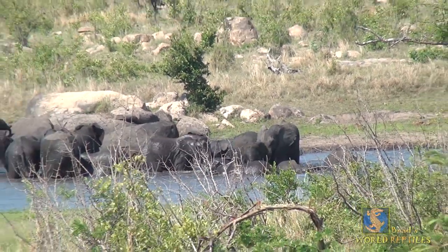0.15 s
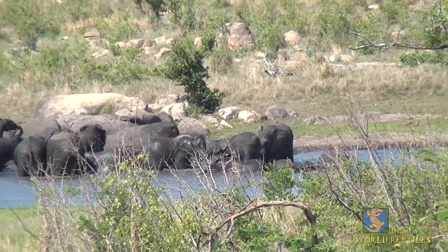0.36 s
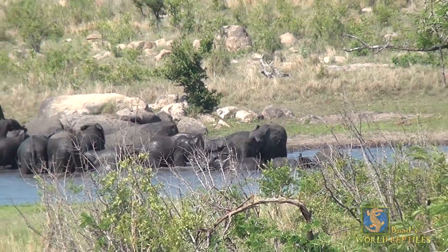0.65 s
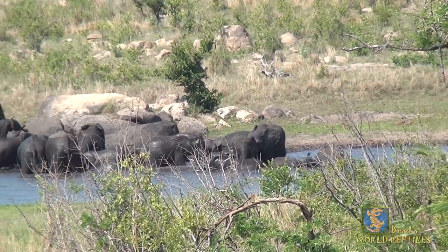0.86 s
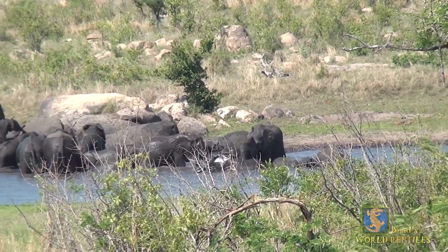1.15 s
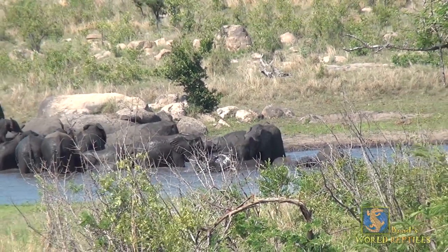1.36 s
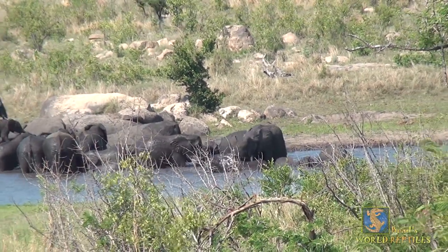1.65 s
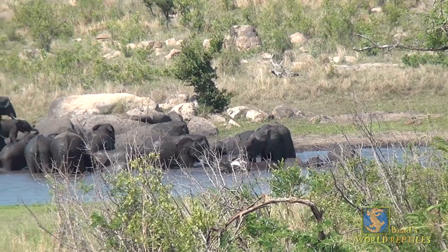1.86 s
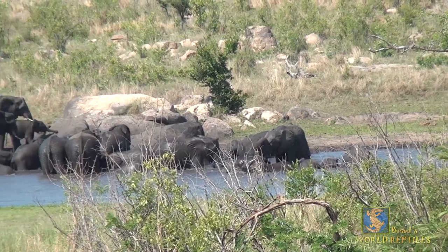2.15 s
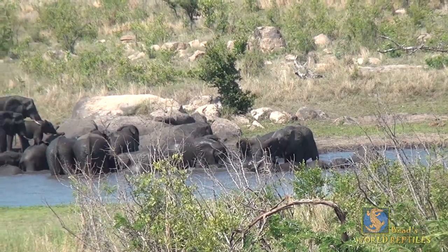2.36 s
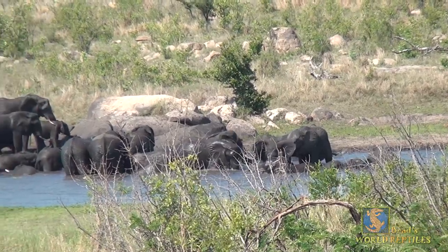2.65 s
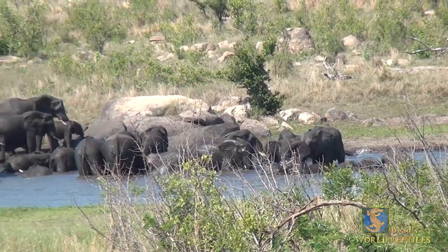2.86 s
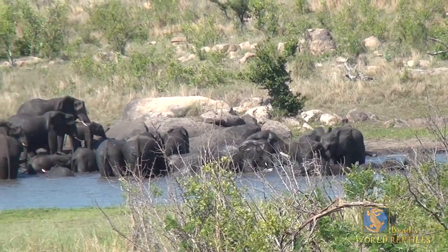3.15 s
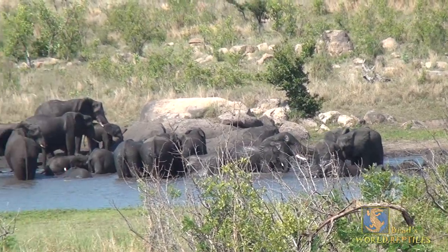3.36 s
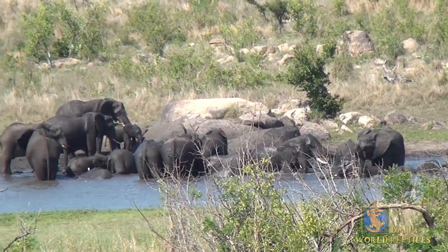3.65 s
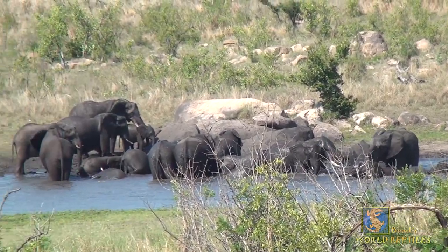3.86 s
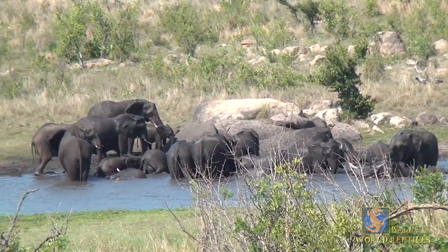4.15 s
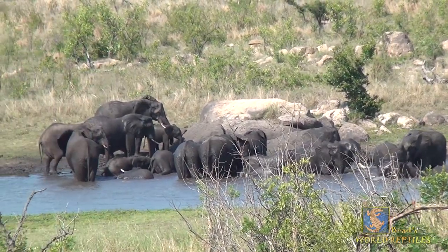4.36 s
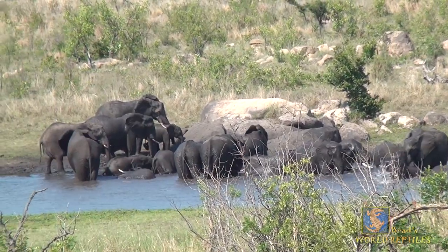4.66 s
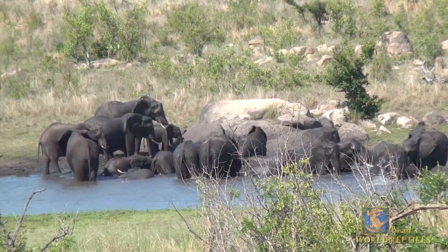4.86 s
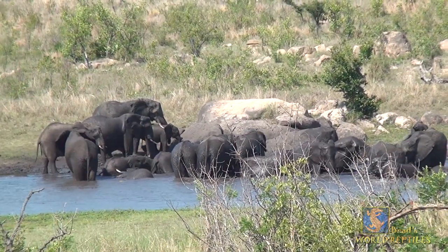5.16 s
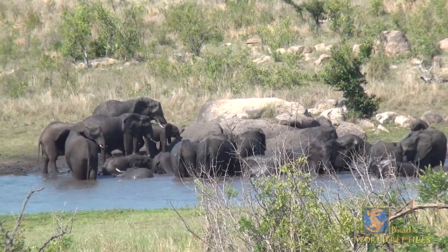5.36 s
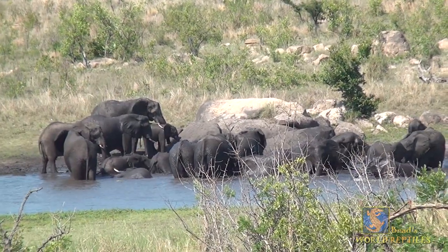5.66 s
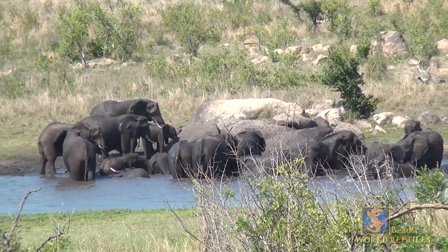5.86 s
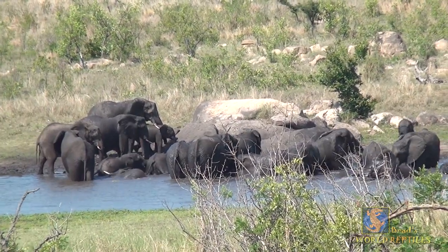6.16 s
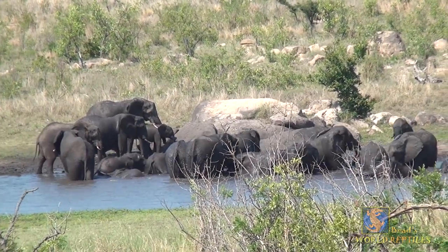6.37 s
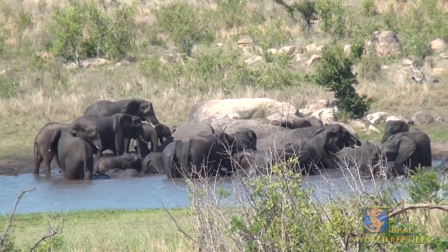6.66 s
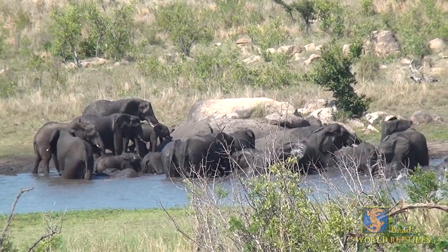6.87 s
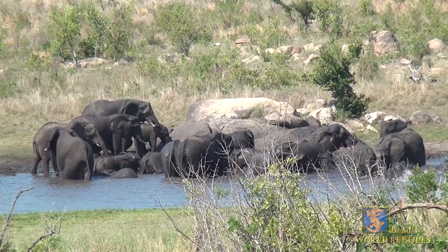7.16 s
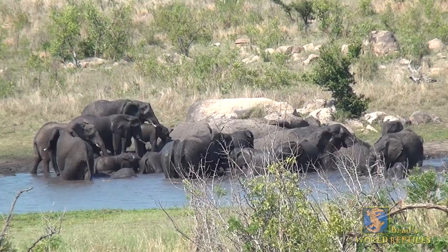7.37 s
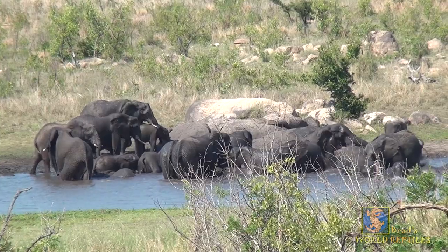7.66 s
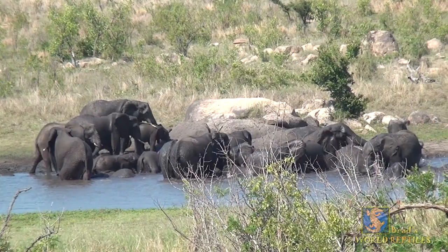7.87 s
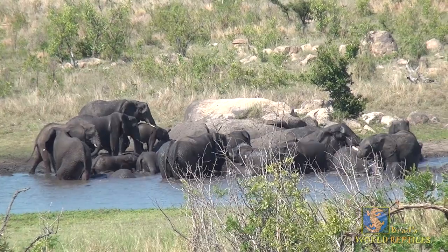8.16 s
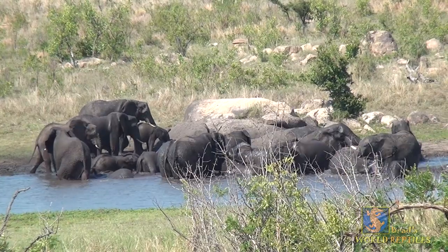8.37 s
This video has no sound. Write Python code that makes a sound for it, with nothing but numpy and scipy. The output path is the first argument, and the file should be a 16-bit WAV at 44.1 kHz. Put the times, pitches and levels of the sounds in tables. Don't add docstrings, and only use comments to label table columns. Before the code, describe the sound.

Several cicadas drone without pause in lakeside shrubs, a shrill, grainy buzz flickering in strength. Gusts thump and rumble against an unshielded microphone, heaviest from about 2.5 to 5 seconds, then easing until a short late return. A small bird pips about three times a second with gaps, others whistle thinly, and elephants wading at the far shore make faint splashes. Twigs snap now and then.

```python
import sys
import numpy as np
from scipy import signal
from scipy.fft import rfft, irfft
from scipy.io import wavfile
from scipy.ndimage import uniform_filter1d

SR = 44100
rng = np.random.default_rng(int(sys.argv[2]) if len(sys.argv) > 2 else 0)


def linear_from_db(decibels):
    return 10 ** (np.asarray(decibels, float) / 20)


def wav_out(sig):
    wavfile.write(sys.argv[1], SR, np.round(np.clip(np.atleast_2d(sig).T, -1, 1) * 32767).astype(np.int16))


N = 375732
TIME = np.arange(N) / SR

# (time [s], burst rate [Hz])
NEAR_RATE = [(0, 70.03), (1.25, 70.03), (1.55, 70.85), (1.87, 71.04), (2.02, 71.58), (2.25, 71.63),
             (3.17, 71.62), (3.85, 71.27), (4.0, 71.13), (4.4, 71.0), (4.95, 70.97), (5.95, 70.5),
             (6.7, 70.25), (7.25, 70.03), (7.8, 70.17), (8.0, 70.06), (8.52, 69.92)]
# (time [s], hold [s], level [dB])
SEVENTH = [(0, 0.18, -69), (.45, .32, -73), (.88, .06, -71), (1.05, .3, -76), (1.647, 0.058, -64),
           (1.8, 0.062, -65), (2.114, 0.103, -57.5), (2.26, 0.097, -58), (2.473, 0.184, -64),
           (2.736, 0.044, -59.5), (2.931, 0.158, -60.9), (3.276, 0.316, -65.5), (3.807, 0.019, -62),
           (4.343, 0.044, -66), (4.435, 0.065, -62), (5.051, 0.034, -66), (6.98, 0.115, -62.5),
           (7.274, 0.043, -64)]
EIGHTH = [(0.156, 0.239, -58), (0.531, 0.044, -53.0), (0.733, 0.136, -57.5), (1.073, 0.126, -58),
          (1.399, 0.177, -57.7), (1.662, 0.023, -54), (1.778, 0.12, -56), (2.161, 0.348, -51.5),
          (2.206, 0.063, -53), (2.29, 0.054, -45.0), (2.645, 0.046, -48), (2.822, 0.075, -52),
          (2.987, 0.16, -49), (3.235, 0.206, -54.5), (3.352, 0.072, -48.5), (3.505, 0.119, -54.4),
          (3.954, 0.13, -52.5), (4.103, 0.447, -55.7), (4.399, 0.079, -51), (4.633, 0.069, -51),
          (4.773, 0.096, -58.5), (4.963, 0.13, -52.5), (5.274, 0.041, -57), (5.405, 0.03, -54),
          (5.672, 0.032, -56), (5.845, 0.026, -56), (6.185, 0.046, -60), (6.415, 0.042, -59),
          (6.62, 0.09, -59.5), (6.995, 0.08, -49.5), (7.19, 0.15, -55.5), (7.505, 0.042, -64),
          (7.735, 0.061, -63), (7.99, 0.11, -61), (8.2, 0.2, -61)]
NINTH = [(0.161, 0.07, -50.7), (0.324, 0.088, -52), (0.502, 0.11, -57), (0.815, 0.054, -53),
         (0.997, 0.033, -56), (1.102, 0.046, -56), (1.206, 0.088, -48.5), (1.425, 0.481, -51),
         (1.581, 0.054, -52), (1.834, 0.044, -51), (2.018, 0.428, -60), (2.047, 0.028, -48),
         (2.186, 0.14, -49.5), (2.505, 0.386, -58), (2.565, 0.016, -50.5), (2.653, 0.034, -48),
         (2.955, 0.14, -46.5), (3.253, 0.077, -50.5), (3.435, 0.184, -51.5), (3.774, 0.031, -51.5),
         (4.025, 0.19, -48.5), (4.326, 0.441, -55), (4.613, 0.057, -49.5), (4.963, 0.075, -49.5),
         (5.256, 0.062, -56), (5.384, 0.064, -55), (5.717, 0.12, -52), (6.174, 0.046, -56),
         (6.625, 0.05, -63), (6.815, 0.05, -62), (6.981, 0.08, -54.5), (7.202, 0.06, -50.5),
         (7.29, 0.1, -56.5), (7.69, 0.11, -60.5), (7.97, 0.12, -61), (8.135, 0.05, -64), (8.41, 0.11, -60)]
TENTH = [(0.184, 0.008, -55), (0.287, 0.045, -56), (0.74, 0.1, -54), (1.042, 0.013, -56),
         (1.191, 0.058, -54.8), (1.436, 0.021, -57), (1.65, 0.044, -57), (1.865, 0.025, -51),
         (2.017, 0.128, -56), (2.233, 0.052, -57.0), (2.385, 0.343, -56), (2.97, 0.14, -53),
         (3.225, 0.037, -54), (3.404, 0.071, -62), (3.592, 0.029, -56.9), (3.855, 0.058, -54),
         (3.994, 0.12, -59.9), (4.314, 0.123, -54.5), (4.581, 0.12, -54), (4.999, 0.0098, -56),
         (5.346, 0.034, -54), (6.958, 0.2, -58), (7.291, 0.07, -63)]
NEAR_LULL_DB = [-75.5, -65.5, -63, -65.5]
NEAR_RISE_DB_S, NEAR_FALL_DB_S = 312, 309

# (time [s], burst rate [Hz])
FAR_RATE = [(0, 76.22), (1.9, 76.35), (2.6, 76.43), (3.8, 76.26), (5.3, 76.25), (5.8, 76.11), (6.6, 76.08),
            (7.4, 75.9), (7.9, 75.62), (8.52, 75.5)]
FAR_DB = [-75, -65, -65.5, -85]
# (time [s], hold [s], level [dB])
FAR_SWELLS = [
    (0, 1.96, 0.5),
    (3.0, 2.3, 0.61),
    (5.9, .7, -0.5),
    (7.7, .8, -0.5),
]
FAR_LULL_DB = -5

# (frequency [Hz], level [dB])
RINGS = [(6620, -9.5), (7010, -2), (7570, -11.5), (8070, -5), (8390, -14), (8720, -8.5), (9080, -1.5),
         (9400, -10), (10150, -6), (10430, -14.5), (11180, -15), (11440, -18)]
BUZZ_EDGES = [7300, 8600, 9700]
BUZZ_GROUP_DB = [-4.5, 1.5, -2, -7.5]
# (time [s], hold [s], level [dB])
BUZZ_LOW_SWELLS = [(0, 0.06, -47), (0.116, 0.87, -52), (0.864, 0.051, -52), (1.037, 0.46, -55.5),
                   (1.072, 0.11, -49), (1.387, 0.07, -53), (1.591, 0.5, -52.5), (1.708, 0.2, -51),
                   (2.417, 0.17, -47.5), (2.694, 0.11, -44), (2.911, 0.3, -53.5), (3.051, 0.071, -48.5),
                   (3.761, 0.075, -56), (3.97, 0.033, -50), (4.303, 0.43, -51.5), (4.315, 0.014, -48.5),
                   (4.531, 0.029, -53), (4.892, 0.23, -49), (5.216, 0.046, -51.5), (6.026, 0.162, -56),
                   (6.57, 0.58, -53.5), (6.636, 0.2, -51), (7.042, 0.22, -50), (8.092, 0.5, -56.5),
                   (8.202, 0.059, -52.5)]
BUZZ_HIGH_SWELLS = [(0, 0.31, -52.5), (0.446, 0.488, -53.5), (1.396, 0.052, -48.5), (1.602, 0.637, -63),
                    (1.67, 0.016, -50), (1.792, 0.089, -50.5), (2.402, 0.52, -46), (2.548, 0.008, -48),
                    (2.734, 0.068, -47), (2.911, 0.517, -64), (3.645, 0.055, -54), (3.976, 0.037, -47),
                    (4.154, 0.023, -52), (4.31, 0.32, -48.5), (4.536, 0.039, -50), (4.883, 0.06, -44.5),
                    (5.025, 0.041, -56), (6.004, 0.16, -52.5), (6.526, 0.355, -51), (6.674, 0.055, -44),
                    (6.953, 0.74, -55), (7.055, 0.11, -54), (7.382, 0.027, -57), (7.495, 0.069, -49.5),
                    (7.868, 0.22, -56.5), (8.318, 0.12, -55)]
BUZZ_TOP_SWELLS = [(0, .15, -51), (1.4, .05, -51), (1.8, .05, -50), (2.4, .25, -51), (2.75, .05, -43),
                   (3.68, .03, -49.5), (4.0, .05, -48), (4.2, .3, -53), (4.852, 0.098, -47),
                   (5.135, .06, -46), (6.052, 0.11, -52), (6.603, .15, -46), (7.3, .2, -54),
                   (8.0, .15, -54), (8.35, .05, -51)]
BUZZ_LULL_DB = [-65, -64, -56.5]
BUZZ_RISE_DB_S, BUZZ_FALL_DB_S = 186, 183
BUZZ_HZ = 46.25
BUZZ_SAG = .019
CHORUS_DB = -58.5

# (frequency [Hz], level per Hz [dB])
BUSH = [(18, -38), (30, 15.5), (64, -4), (130, -6.5), (243, -3.5), (811, -14), (1200, -13.5), (3600, -17),
        (4680, -14), (5620, -5.5), (6580, -10), (8110, -2), (9240, -8), (10800, -19.5), (12000, -24),
        (15600, -29.5)]
BUSH_DB = -58.5

# (frequency [Hz], level per Hz [dB])
WIND = [(15, -44), (25, -6.5), (64, 4), (114, -3.5), (259, -15), (407, -24), (667, -51.5), (900, -42),
        (1170, -75), (1980, -120)]
# (time [s], level [dB])
BREEZE = [(0, -51), (.6, -53.5), (1.6, -63), (2.5, -38), (4.5, -38), (5.15, -49.5), (5.5, -55.5),
          (5.9, -61), (7.2, -69), (7.45, -43), (8.52, -46)]
# (time [s], hold [s], level [dB], bite [dB])
GUSTS = [(0.155, 0.013, -40.5, -7), (0.479, 0.008, -47, 4), (0.524, 0.01, -36, -2),
         (0.793, 0.094, -31.5, 7.5), (0.943, 0.01, -35.5, 6), (0.983, 0.064, -34.5, 5),
         (1.162, 0.004, -24, -1), (1.282, 0.007, -35, -4), (1.372, 0.034, -41.5, -7),
         (1.691, 0.094, -36, -8), (1.856, 0.06, -35.5, -21), (2.09, 0.016, -37, 5), (2.27, 0.044, -37.5, 4),
         (2.449, 0.012, -32.5, 2), (2.684, 0.018, -27, 6), (2.759, 0.03, -23.5, 5.5),
         (2.913, 0.0046, -24, 2), (3.013, 0.014, -28, 8.5), (3.113, 0.052, -23.5, 2.5),
         (3.258, 0.1, -26, 2.5), (3.462, 0.0072, -35, -16), (3.542, 0.016, -28.5, -2.5),
         (3.662, 0.032, -31.5, 1), (3.796, 0.064, -29.5, 0), (4.036, 0.0074, -26.5, -8),
         (4.081, 0.019, -27.5, 1), (4.181, 0.0058, -30.5, -7), (4.32, 0.008, -36, -14),
         (4.35, 0.014, -30, 1), (4.57, 0.0065, -30, -1), (4.639, 0.0083, -27, -12),
         (4.714, 0.0067, -32, -2), (4.749, 0.026, -28, -4), (4.839, 0.034, -28.5, 1.5),
         (5.078, 0.0069, -33.5, 11), (5.113, 0.026, -35.5, 7), (5.223, 0.0055, -34.5, -4),
         (7.323, 0.0064, -41, 10), (7.378, 0.006, -33, -2), (7.488, 0.0047, -29.5, 2.5),
         (7.543, 0.008, -34, 6), (7.593, 0.0046, -30.5, 4), (7.708, 0.008, -32, 4),
         (7.762, 0.0098, -28.5, 2), (7.897, 0.01, -42.5, 11.5), (8.176, 0.024, -37.6, -11),
         (8.346, 0.008, -35.5, 4), (8.401, 0.03, -39, -0.5), (8.481, 0.0092, -40, 7.5),
         (.15, 0.012, -44, -2),
    (.665, 0.062, -42.5, 5),
    (1.36, 0.055, -49, -5),
    (2.84, 0.024, -25.5, 6.5),
    (5.35, .03, -48, 0),
    (5.66, 0.023, -44.5, -11),
    (6.11, 0.01, -44, -6),
    (6.3, 0.15, -50, 4),
]
GUST_RISE_DB_S, GUST_FALL_DB_S = 211, 240
# (time [s], peak level [dB], frequency [Hz])
EDDIES = [(0.476, -27, 158), (0.788, -24, 133), (0.827, -24.5, 150), (0.857, -23, 118), (0.941, -22, 128.4),
          (1.086, -22, 152), (1.115, -19.5, 179), (1.16, -11, 153), (2.259, -22.5, 112), (2.279, -23, 102),
          (2.305, -24, 133), (2.444, -22.5, 117), (2.483, -23.5, 129), (2.635, -19, 112),
          (2.658, -22.6, 153), (2.685, -11.5, 156), (2.754, -18, 116), (2.787, -14, 138), (2.833, -15, 152),
          (2.885, -22, 134), (2.913, -11, 118), (3.011, -7.5, 160), (3.047, -11, 110), (3.112, -16.5, 162),
          (3.172, -13, 124), (3.258, -19, 126), (3.282, -15, 214), (3.318, -18, 112), (3.36, -16, 152),
          (3.542, -23, 112), (3.569, -21.5, 122), (3.661, -23, 139), (3.798, -24, 120), (3.823, -24, 180),
          (3.986, -22.5, 113), (4.043, -17.5, 118), (4.068, -25, 151), (4.119, -18, 131), (4.318, -21, 93),
          (4.571, -29, 113), (4.619, -22.3, 130), (4.645, -19, 129), (4.717, -17.5, 123),
          (4.75, -12.5, 200), (4.831, -17, 126), (4.857, -18.5, 138), (5.083, -17.5, 150),
          (5.143, -22, 125), (7.371, -25, 110), (7.479, -21.5, 139), (7.543, -19.5, 165),
          (7.59, -13.5, 145), (7.706, -14.5, 152), (7.776, -23, 133),
          (1.685, -28.5, 188),
    (6.096, -33, 74.6),
    (6.121, -28, 84),
    (7.677, -20.5, 170),
    (7.738, -26, 201),
]

# (time [s], hold [s], spray level [dB], slosh over spray [dB])
SPLASHES = [(1.1, .55, -60.5, -20), (2.56, .03, -54.5, -14), (3.44, 0.11, -47.5, -4.5),
            (3.69, 0.02, -48.5, 3), (4.08, 0.15, -55.5, 8), (4.4, 0.46, -61, 7.5),
            (5.03, 0.17, -52.5, -4.5), (5.3, 0.63, -63, 4.5), (6.08, 0.38, -55.5, -1.5),
            (6.6, 1.35, -63.5, 4), (8.2, 0.32, -61, 3)]
SPLASH_RISE_DB_S, SPLASH_FALL_DB_S = 66, 56
CALM_SLOSH_DB, CALM_SPRAY_DB = -80.5, -70.5

# (time [s], peak level [dB], frequency [Hz])
PIPS = [(0.0608, -58, 2850), (0.3686, -50.5, 2780), (0.6809, -57, 2800), (0.9966, -56, 2800),
        (1.2905, -57, 2780), (1.898, -51.5, 2760), (2.2039, -56, 2740), (2.491, -53, 2730),
        (3.1193, -52.5, 2710), (4.0382, -54, 2700), (4.345, -55, 2730), (4.6568, -48, 2710),
        (4.969, -49, 2720), (5.2824, -52, 2720), (5.5827, -51, 2730), (5.8845, -55, 2740),
        (6.4991, -51, 2790), (6.7905, -46.5, 2790), (7.0903, -53, 2820), (7.3906, -47.5, 2790),
        (7.6819, -56, 2790)]
# (time [s], length [s], start frequency [Hz], end frequency [Hz], level [dB])
WHISTLES = [(0.134, 0.041, 3870, 4900, -74), (0.46, .04, 4200, 5200, -68), (0.504, 0.044, 4830, 4770, -62),
            (0.507, .09, 3550, 3380, -68), (1.06, 0.032, 4400, 5700, -62), (2.087, 0.12, 3800, 3450, -73),
            (2.41, 0.034, 5000, 4290, -66), (2.475, 0.15, 4000, 3380, -69), (2.608, 0.068, 4330, 4880, -63),
            (2.79, 0.078, 4100, 3800, -70), (2.85, 0.023, 4900, 4000, -63),
            (2.96, 0.097, 3800, 3240, -69.5), (3.14, .03, 4250, 4900, -67), (5.812, 0.032, 4350, 4850, -58),
            (6.30, 0.025, 4400, 5000, -68), (6.405, .04, 3420, 2930, -65), (6.53, 0.073, 3430, 4250, -59),
            (7.01, 0.027, 3950, 3750, -72)]

# (time [s], peak level [dB], frequency [Hz])
SNAPS = [(0.805, -41.5, 3580), (2.098, -48, 2400), (3.393, -49, 2500), (3.433, -46, 1510),
         (3.688, -41.5, 770), (3.72, -42, 2420), (4.086, -43, 3000), (4.085, -40.5, 1410),
         (4.98, -43, 3400), (5.136, -46, 1520), (5.31, -48.5, 720), (7.535, -40.5, 4200),
         (7.535, -46, 3080), (7.683, -51, 3000)]
# (first click time [s], last click time [s], level [dB])
RATTLES = [(1.74, 1.99, -54.5)]
RATTLE_GAP_S, RATTLE_HZ = 0.022, 3000
# (time [s], peak level [dB])
TICKS = [
    (2.0358, -47),
    (2.4144, -42),
    (2.9123, -51),
    (3.7569, -53),
    (7.4644, -49),
]


def curve(table):
    s, *columns = np.transpose(table)
    return [np.interp(TIME, s, c) for c in columns]


def unit(x):
    return x / np.sqrt(np.mean(x ** 2))


def band(x, lo_hz, hi_hz):
    return signal.sosfilt(signal.butter(2, [lo_hz, hi_hz], "bandpass", fs=SR, output="sos"), x)


def walk(rate):
    coarse = TIME[::64]
    hold = int(SR / 64 / rate)
    steps = np.repeat(rng.standard_normal(len(coarse) // hold + 1), hold)
    smooth = uniform_filter1d(uniform_filter1d(steps, hold), hold)
    return np.interp(TIME, coarse, unit(smooth[:len(coarse)]))


def add(out, s, sound):
    i = int(s * SR)
    out[i:i + len(sound)] += sound[:N - i]


def swells(rows, rise_db_s, fall_db_s, lull_db, colour=lambda c: 0):
    t = TIME[::64]
    s, hold, db, last = np.transpose(rows)[[0, 1, 2, -1], :, None]
    before = np.maximum(s - t, 0)
    after = np.maximum(t - s - hold, 0)
    db = db + colour(last) - rise_db_s * before - fall_db_s * after
    lull_db = np.broadcast_to(lull_db, N)[::64]
    power = np.sum(linear_from_db(db) ** 2, axis=0) + linear_from_db(lull_db) ** 2
    return np.interp(TIME, t, 10 * np.log10(power))


def singer(rate_hz, rings, duty, sharp, sag, rough, smear, fade_db, fade_rate):
    turn = np.cumsum(rate_hz) / SR % 1
    p = np.minimum(turn / duty, 1)
    gate = np.abs(np.sin(np.pi * p)) ** sharp
    echoes = (gate + .5) * rng.standard_normal(N)
    out = 0
    for cycles, db in rings:
        phase = 2 * np.pi * cycles * (turn - sag * (p * p - p)) + walk(3)
        tone = gate * np.cos(phase)
        hz = cycles * np.mean(rate_hz)
        echo = band(echoes, hz * (1 - smear), hz * (1 + smear))
        ring = unit(tone) + rough * unit(echo)
        out = out + linear_from_db(db + fade_db * walk(fade_rate)) * unit(ring)
    return out


def overtone_cycles(overtone):
    return 9 * overtone + .39


def near_cicada():
    overtones = enumerate(zip([SEVENTH, EIGHTH, NINTH, TENTH], NEAR_LULL_DB), 7)
    rings = [(overtone_cycles(k), swells(rows, NEAR_RISE_DB_S, NEAR_FALL_DB_S, lull_db))
             for k, (rows, lull_db) in overtones]
    return singer(curve(NEAR_RATE)[0], rings, duty=.98, sharp=.72, sag=0,
                  rough=.06, smear=.025, fade_db=.9, fade_rate=15)


def far_cicada():
    carry_db = swells(FAR_SWELLS, 60, 60, FAR_LULL_DB)
    rings = [(overtone_cycles(k), db + carry_db) for k, db in enumerate(FAR_DB, 7)]
    return singer(curve(FAR_RATE)[0], rings, duty=1, sharp=.5, sag=0,
                  rough=.4, smear=.02, fade_db=3.5, fade_rate=8)


def buzz_group(hz):
    return np.searchsorted(BUZZ_EDGES, hz)


def buzz_rings():
    return [(hz, db + BUZZ_GROUP_DB[buzz_group(hz)]) for hz, db in RINGS]


def buzzer():
    groups = zip((BUZZ_LOW_SWELLS, BUZZ_HIGH_SWELLS, BUZZ_TOP_SWELLS), BUZZ_LULL_DB)
    low_db, high_db, top_db = (swells(rows, BUZZ_RISE_DB_S, BUZZ_FALL_DB_S, lull_db)
                               for rows, lull_db in groups)
    arrive_db = [low_db, low_db, high_db, top_db]
    rings = [(hz / BUZZ_HZ, db + arrive_db[buzz_group(hz)]) for hz, db in buzz_rings()]
    return singer(BUZZ_HZ * (1 + .003 * walk(1.5)), rings, duty=.85, sharp=.4, sag=BUZZ_SAG,
                  rough=.2, smear=.013, fade_db=2.2, fade_rate=9)


def buzzer_chorus():
    rings = [(hz / BUZZ_HZ, db + CHORUS_DB) for hz, db in buzz_rings() if hz < BUZZ_EDGES[-1]]
    return singer(45.7 + .3 * walk(1.5), rings, duty=.85, sharp=.4, sag=BUZZ_SAG,
                  rough=.4, smear=.012, fade_db=4.2, fade_rate=5)


def bush():
    hz, db = np.transpose(BUSH)
    f = np.maximum(np.arange(N // 2 + 1) * SR / N, 1)
    dip_db = 3.9 * np.exp(-((f - 7500) / 3000) ** 2)
    shape_db = np.interp(np.log(f), np.log(hz), db) - dip_db
    noise = irfft(rfft(rng.standard_normal(N)) * linear_from_db(shape_db), N)
    return linear_from_db(BUSH_DB + .3 * walk(1.5)) * noise / np.std(band(noise, 250, 4300))


def wind():
    gusts = GUSTS
    breeze_db = curve(BREEZE)[0]
    gust_db = swells(gusts, GUST_RISE_DB_S, GUST_FALL_DB_S, breeze_db)
    bite_db = swells(gusts, GUST_RISE_DB_S, GUST_FALL_DB_S, breeze_db, lambda bite: 1.67 * bite)
    hz, db = np.transpose(WIND)
    lump_db = 1.82 * walk(35)
    out = 0
    for centre in 35 * 2 ** np.arange(0, 5, .5):
        gain_db = np.interp(np.log(centre), np.log(hz), db) + 10 * np.log10(centre)
        steep = 0.4 * max(np.log2(centre / 90), 0)
        noise = unit(band(rng.standard_normal(N), centre / 2 ** .25, centre * 2 ** .25))
        flutter_db = 2.0 * walk(min(centre / 5, 30))
        out = out + noise * linear_from_db(gain_db + steep * (bite_db + 18.5 + lump_db) + flutter_db)
    out /= np.sqrt(uniform_filter1d(out ** 2, SR // 18))
    return out * linear_from_db(gust_db + lump_db - 1.5)


def eddies():
    out = np.zeros(N)
    for s, peak_db, hz in EDDIES:
        t = np.arange(-2 / hz, 2 / hz, 1 / SR)
        packet = np.exp(-(t * hz / 0.45) ** 2) * np.sin(2 * np.pi * hz * t + 1.82)
        add(out, s - 2 / hz, linear_from_db(peak_db - 5.5) * packet)
    return out


def water():
    slosh_db = swells(SPLASHES, SPLASH_RISE_DB_S, SPLASH_FALL_DB_S, CALM_SLOSH_DB, lambda low_db: low_db)
    spray_db = swells(SPLASHES, SPLASH_RISE_DB_S, SPLASH_FALL_DB_S, CALM_SPRAY_DB)
    out = 0
    for hz in 500 * 2 ** np.arange(0, 3, 1 / 3):
        hits = rng.random(N) < 1000 / SR
        size_db = 2.6 * np.minimum(rng.exponential(size=N), 5)
        drops = hits * rng.standard_normal(N) * linear_from_db(size_db)
        fine = np.clip(np.log2(hz / 900), 0, 1)
        level_db = (1 - fine) * slosh_db + fine * spray_db - 14 * max(np.log2(hz / 2200), 0)
        ringing = unit(band(drops, hz / 1.166, hz * 1.298))
        out = out + linear_from_db(level_db - 10.5 + 1.4 * walk(14)) * ringing
    return out


def pips():
    out = np.zeros(N)
    t = TIME[:SR // 20]
    envelope = (1 - np.exp(-t / 0.002)) * np.exp(-(t / 0.024) ** 2)
    scoop = 8.2 * (1 - np.exp(-t / 0.0028))
    for s, db, hz in PIPS:
        tone = np.sin(2 * np.pi * hz * t * (1.0 - 0.081 * t) + scoop)
        add(out, s - .003, linear_from_db(db - 1.5) * envelope * tone)
    return out


def whistles():
    out = np.zeros(N)
    for s, length, from_hz, to_hz, db in WHISTLES:
        n = int(length * SR)
        waver_db = 2.5 * np.interp(np.arange(n), np.linspace(0, n, 9), rng.standard_normal(9))
        phase = 2 * np.pi * np.cumsum(np.geomspace(from_hz, to_hz, n)) / SR
        add(out, s, linear_from_db(db + 6.0) * linear_from_db(waver_db) * np.hanning(n) ** 0.32 * np.sin(phase))
    return out


def damped_click(hz):
    t = TIME[:SR // 50]
    ring = t * hz / 1.86
    return np.e * ring * np.exp(-ring) * np.sin(2 * np.pi * hz * t)


def snaps():
    out = np.zeros(N)
    for s, db, hz in SNAPS:
        add(out, s, linear_from_db(db) * damped_click(hz))
    return out


def frog():
    out = np.zeros(N)
    for first_s, last_s, db in RATTLES:
        for s in np.arange(first_s, last_s, RATTLE_GAP_S):
            add(out, s, linear_from_db(db + 3.5 * rng.standard_normal()) * damped_click(RATTLE_HZ))
    return out


def ticks():
    out = np.zeros(N)
    t = TIME[:SR // 50]
    for s, db in TICKS:
        spit = unit(band(rng.standard_normal(len(t)), 12500, 17000))
        add(out, s, linear_from_db(db - 5.0) * np.exp(-t / .0015) * spit)
    return out


def scene():
    cicadas = near_cicada() + far_cicada() + buzzer() + buzzer_chorus()
    air = bush() + wind() + eddies()
    birds = pips() + whistles()
    return (cicadas + air + water() + birds + snaps() + frog() + ticks())[None]


def top_cut(x):
    return signal.sosfilt(signal.butter(12, 15720, fs=SR, output="sos"), x)


def record(dry):
    mix = signal.sosfilt(signal.butter(3, 42, "highpass", fs=SR, output="sos"), dry)
    return top_cut(mix)


dry = scene()
out = record(dry)
wav_out(out)
```